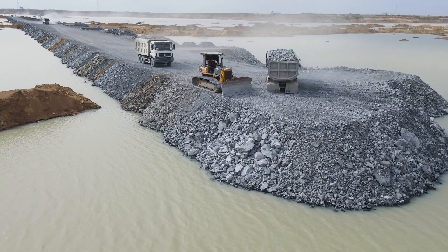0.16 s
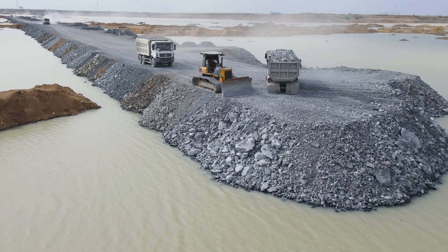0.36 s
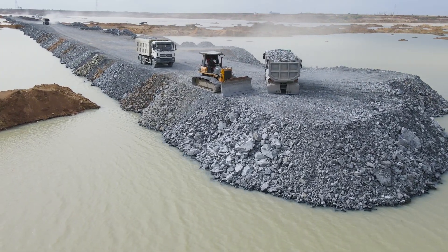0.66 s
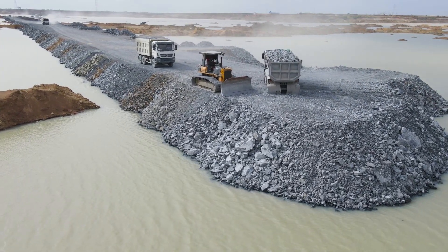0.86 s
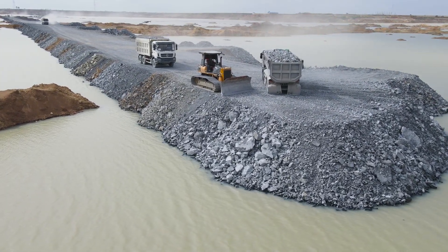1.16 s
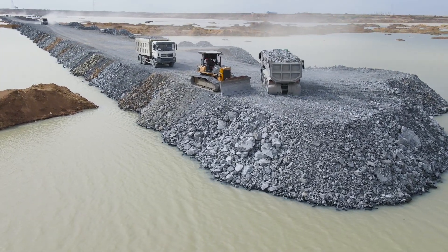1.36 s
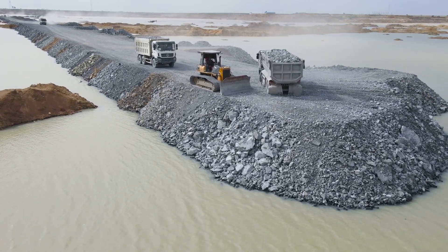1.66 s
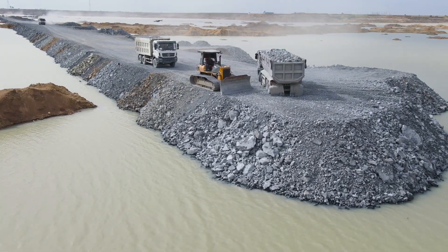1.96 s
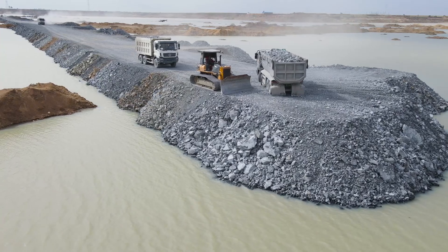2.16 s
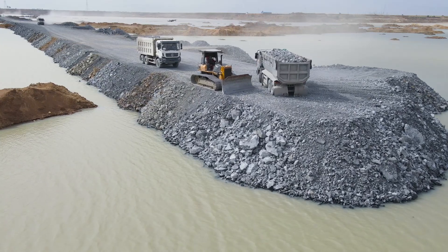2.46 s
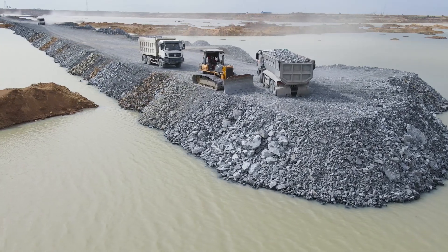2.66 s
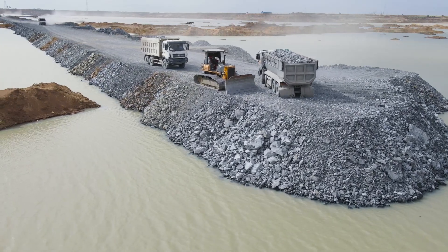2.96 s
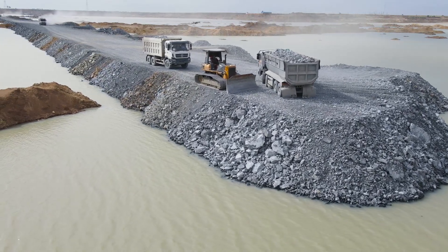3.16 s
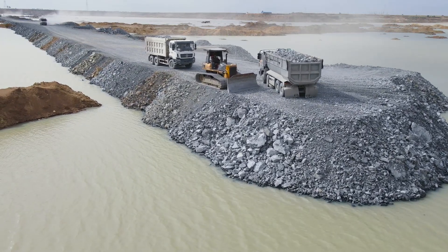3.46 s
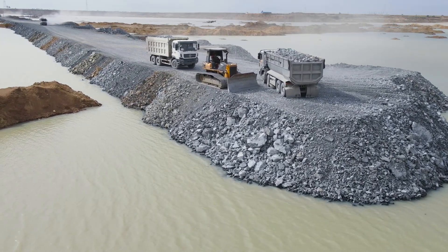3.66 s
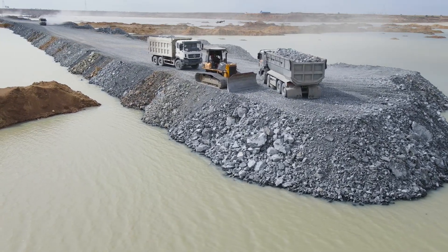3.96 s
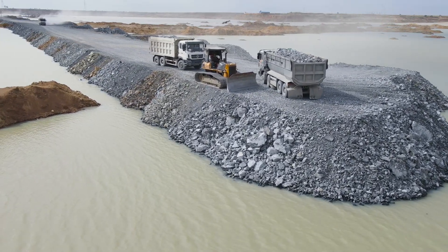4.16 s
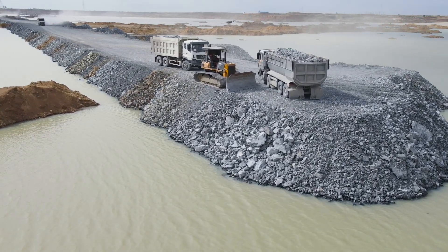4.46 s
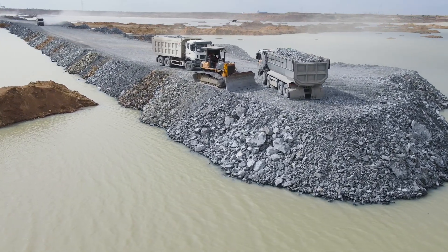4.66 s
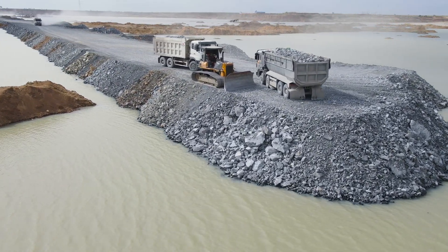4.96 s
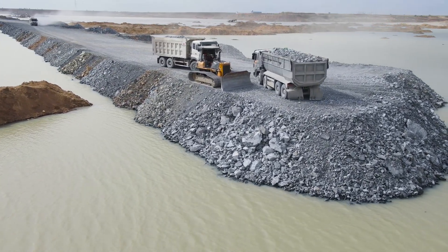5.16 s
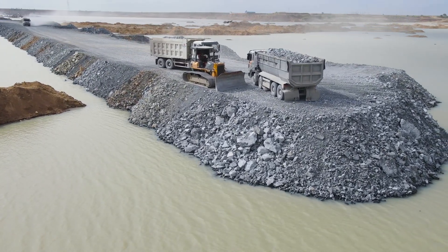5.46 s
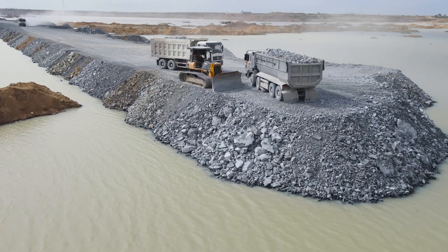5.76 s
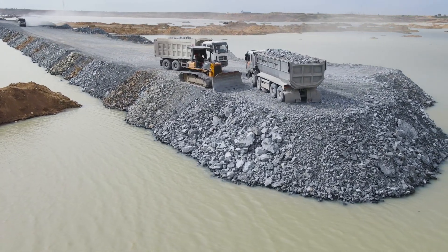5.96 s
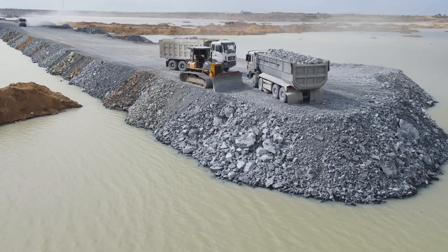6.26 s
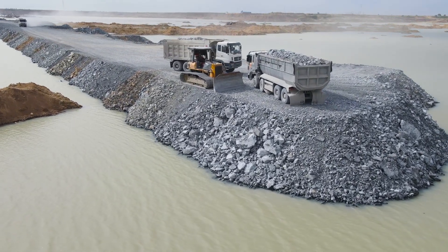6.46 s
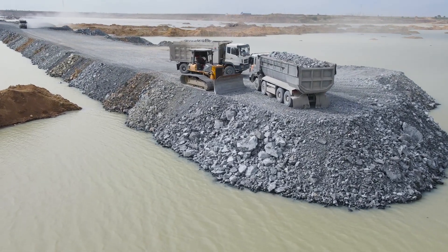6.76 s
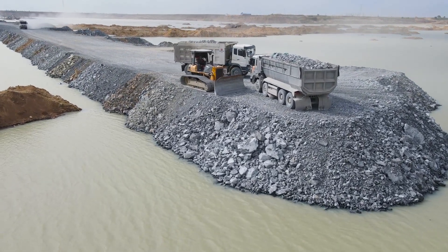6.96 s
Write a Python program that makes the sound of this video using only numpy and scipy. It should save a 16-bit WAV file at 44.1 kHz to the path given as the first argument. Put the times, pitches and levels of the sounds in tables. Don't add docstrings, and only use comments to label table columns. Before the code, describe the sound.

Heavy diesel earthmoving machines boom and roar on an open rock bank, growing louder, with knocks, crunching stones, thin turbo whistle and light wind buffeting.

```python
import sys
import numpy as np
from scipy import signal
from scipy.fft import rfft, irfft
from scipy.io import wavfile
from scipy.ndimage import uniform_filter1d, map_coordinates

SR = 44100
rng = np.random.default_rng(int(sys.argv[2]) if len(sys.argv) > 2 else 0)


def waveform_to_disk(signal):
    frames = np.transpose(np.atleast_2d(signal))
    scaled = np.clip(frames, -1, 1) * 32767
    samples = np.round(scaled).astype(np.int16)
    wavfile.write(sys.argv[1], SR, samples)


def gain_from_db(level_db):
    decades = np.asarray(level_db, float) / 20
    return 10 ** decades


N = 313551
TIME_S = np.arange(N) / SR
HZ = np.maximum(np.arange(N // 2 + 1) * SR / N, 1)
OPPOSITE = np.array([[1], [-1]])


def unit(x):
    return x / np.sqrt(np.mean(x ** 2))


def curves(table):
    s, *columns = np.transpose(table)
    return [np.interp(TIME_S, s, column) for column in columns]


def over_hz(table):
    hz, value = np.transpose(table)
    return np.interp(np.log(HZ), np.log(np.maximum(hz, 1)), value)


def swells(table):
    return sum(db * np.exp(-((TIME_S - s) / half) ** 2) for s, db, half in table)


def walk(rate_hz):
    hold = int(SR / rate_hz)
    steps = np.repeat(rng.standard_normal(N // hold + 1), hold)
    smooth = uniform_filter1d(uniform_filter1d(steps, hold), hold)
    return unit(smooth[:N])


def noise(colour, lo_hz, hi_hz):
    below = (colour[0][0] / HZ / 2) ** 8
    above = (HZ / colour[-1][0] / 2) ** 8
    gain = gain_from_db(over_hz(colour)) / (1 + below + above)
    inside = (HZ > lo_hz) & (HZ < hi_hz)
    gain = gain / np.sqrt(np.sum(gain[inside] ** 2) / len(HZ))
    return irfft(rfft(rng.standard_normal(N)) * gain, N)


# time_s, firing_rate_hz, boom_db
EXHAUST = [(0, 71.1, -23.5), (.34, 71.9, -21.5), (.57, 67.68, -17.5), (.72, 61.14, -12.5),
           (1.25, 61.85, -13), (1.46, 58.79, -12), (2.08, 58.55, -12), (2.24, 59.79, -13),
           (2.79, 59.33, -13.5), (3.44, 59.96, -16), (3.6, 60.15, -11), (4.45, 60.93, -13.5),
           (5.0, 65.18, -10.5), (5.43, 65.24, -9.5), (5.62, 68.2, -10), (6.36, 66.25, -11),
           (6.5, 64.1, -11), (7.11, 60.7, -9.5)]
# time_s, depth_db, half_length_s
DROPOUTS = [(.1, 14, 0.021), (.26, 1, .06), (.47, 2, .04), (.655, 8, 0.041), (1.08, 3, 0.051),
            (2.16, 5, 0.037), (2.32, 17, 0.02), (2.64, 3, 0.058), (2.89, 9.5, 0.076), (3.25, 4, .03),
            (3.76, 3, 0.073), (4.22, 1.5, 0.014), (4.43, 8.5, 0.015)]
# times_firing_rate, under_boom_db
OVERTONES = [(2 / 3, -37), (4 / 3, -31.5), (5 / 3, -28.5), (2, -18), (7 / 3, -32), (8 / 3, -31.5),
             (3, -23.5), (10 / 3, -24), (3.7, -36), (4, -28), (13 / 3, -27), (14 / 3, -22.5), (6.2, -37),
             (19 / 3, -27), (10, -33.5)]
# time_s, against_full_load_db
LOAD = [(0, -15.5), (.8, -11.5), (1.4, -10), (1.7, -8), (1.95, -13.5), (2.2, -10), (2.9, -8.5), (3.3, -6.5),
        (3.8, -8.5), (4.4, -7.5), (4.9, -2.5), (5.2, 1), (5.8, -0.5), (6.3, -1.5), (7.11, -1)]


def exhaust():
    hz, boom_db = curves(EXHAUST)
    boom_db = boom_db - swells(DROPOUTS)
    phase = 2 * np.pi * np.cumsum(hz * (1 + 0.0056 * walk(25))) / SR
    boom = gain_from_db(boom_db + 0.58 * walk(30)) * np.sin(phase)
    slow_db = uniform_filter1d(boom_db, SR // 3)
    skew_rad = np.interp(curves(LOAD)[0], [-8, -2], [0.5, 1.5])
    for k, db in OVERTONES:
        level = gain_from_db(slow_db + db + 2.25 * walk(9))
        boom = boom + level * np.sin(k * phase + skew_rad * (k - 1) + 0.43 * walk(5))
    return np.sqrt(2) * boom, phase


def layer_db(full_db, share, leaving_db):
    lift_s, fade_db_per_s = 0.78, 9
    effort_db, = curves(LOAD)
    near = gain_from_db(full_db + share * effort_db)
    leaving = gain_from_db(leaving_db - fade_db_per_s * np.maximum(TIME_S - lift_s, 0))
    return 10 * np.log10(near ** 2 + leaving ** 2)


# pitch_hz, level_db (per Hz)
THUD = [(25, -24), (45, -10.5), (90, 4), (150, -1), (230, -0.5), (300, -12.5)]
# time_s, level_db, half_length_s
BUMPS = [(.15, -7.5, 0.13), (.64, 4, 0.059), (1.0, 3, 0.024), (1.55, -6, 0.47), (2.15, 3.5, 0.35),
         (2.55, 4.5, 0.062), (3.07, -22, 0.21), (3.47, -10, 0.077), (3.66, -5.5, 0.026), (4.15, 5, 0.17),
         (4.8, 3.5, 0.11), (5.12, 1, 0.11), (5.3, -4.5, 0.083), (5.79, 1, 0.099), (6.7, -5, 0.21)]


def thud(phase):
    db = layer_db(-23, 0.66, -68) + swells(BUMPS) + 1.2 * walk(8)
    return (1 + 0.52 * np.cos(phase)) * gain_from_db(db) * noise(THUD, 139.0, 242)


# pitch_hz, level_db (per Hz)
RUMBLE = [(200, -48), (270, -0.5), (420, 2.5), (520, -4), (700, -17), (1000, -25)]


def rumble():
    return gain_from_db(layer_db(-25.5, 0.36, -25.5) - 0.26) * noise(RUMBLE, 290, 660)


# pitch_hz, level_db (per Hz)
ROAR = [(300, -35), (650, 3), (900, 0), (1300, -2.5), (1700, -8), (2200, -7), (2900, -6.5), (3300, -9.5),
        (3800, -13), (4800, -10.5), (6000, -35.5)]


def roar(phase):
    db = layer_db(-24.5, 0.94, -42) + 1.04 * walk(10)
    return gain_from_db(db) * (1 + 0.07 * np.cos(phase)) * noise(ROAR, 908, 2630)


# pitch_hz, level_db (per Hz)
HISS = [(3500, -4), (5200, 7), (6000, 5.5), (7500, 4.5), (9000, 2), (10000, 7), (11000, 2.5), (11600, -5.5),
        (12100, -47)]


def hiss():
    return gain_from_db(layer_db(-41, 0.75, -53.5) + 1.13 * walk(15)) * noise(HISS, 5380, 7560)


def machines(phase):
    return thud(phase) + rumble() + roar(phase) + hiss()


# time_s, whistle_hz, level_db
TURBO = [(0, 10140, -49), (.7, 10000, -54), (1.4, 9840, -44), (1.55, 9540, -41), (1.9, 8580, -63),
         (2.2, 7900, -58), (2.55, 7370, -50), (2.9, 6680, -74), (3.3, 6350, -62), (5.2, 6880, -73),
         (5.48, 7200, -53), (5.7, 7720, -43), (5.85, 7970, -53), (6.05, 7960, -54), (6.25, 7870, -46),
         (6.8, 7450, -44.5), (6.9, 7540, -65), (7.11, 7350, -42)]


def turbo():
    hz, db = curves(TURBO)
    waver_db = 2 * walk(22)
    phase = 2 * np.pi * np.cumsum(hz * (1 + 0.003 * walk(110))) / SR
    port_lead_rad = np.array([[1.9], [0]])
    return np.sqrt(2) * gain_from_db(db + waver_db) * np.sin(phase + port_lead_rad)


# time_s, above_calm_db, half_length_s
WIND = [(.1, 16, 0.46), (.72, 24, 0.41), (1.25, 9, 0.18), (1.6, 20, 0.57), (2.0, 13.5, 0.22),
        (2.42, 18, 0.15), (3.3, 27.5, 0.51), (3.8, 9.5, 0.24), (4.6, 3, .25), (5.0, -4, 0.25),
        (5.3, 22, 0.19), (5.62, -1, .17), (6.1, 15, 0.08), (7.11, 30, 0.094)]
# pitch_hz, level_db (per Hz)
BUFFET = [(20, -13), (60, 3), (120, -1.5), (250, -12.5), (450, -13.5), (800, -24), (1200, -34)]


def wind():
    calm_db = -50.5
    db = calm_db + swells(WIND) + 3 * walk(14)
    across = gain_from_db(db + walk(17)) * noise(BUFFET, 83, 210)
    along = gain_from_db(db + walk(17)) * noise(BUFFET, 83, 210)
    return across * OPPOSITE + gain_from_db(-6.5) * along


# time_s, peak_db, centre_hz, length_s
KNOCK = [
    (0.572, -18, 230, 0.0026),
    (0.589, -5, 295, 0.0021),
    (0.619, -6.5, 263, 0.0028),
    (.632, -2, 187, 0.0019),
]


def knocks():
    out = 0
    for s, db, hz, length in KNOCK:
        swing = np.cos(2 * np.pi * hz * (TIME_S - s))
        out = out + gain_from_db(db) * swing * np.exp(-((TIME_S - s) / length) ** 2)
    return out


def grind(table):
    grit = rfft(rng.standard_normal(N) * gain_from_db(2.1 * rng.exponential(size=N)))
    out = 0
    for s, db, hz, width, length in table:
        resonance = 1 / (1 + 1j * (HZ ** 2 - hz ** 2) / (HZ * width)) ** 2
        ring = unit(irfft(grit * resonance, N))
        out = out + gain_from_db(db) * ring * np.exp(-np.abs((TIME_S - s) / length) ** 2.8)
    return out


# time_s, level_db, centre_hz, width_hz, length_s
CRUNCH = [(0.612, -25, 210, 290, 0.034), (0.794, -37.5, 5030, 5800, 0.012),
          (1.383, -31.5, 2200, 3450, 0.045), (1.568, -43, 1800, 3020, 0.029),
          (1.644, -30.5, 2540, 4000, .012), (1.902, -40, 2000, 3500, 0.017),
          (2.392, -35, 1507, 2497, 0.0091), (3.097, -28.5, 2200, 3350, 0.027),
          (5.692, -32.5, 4100, 4900, 0.019), (5.693, -27, 3730, 91, 0.022), (5.69, -25.5, 1800, 3000, .03),
          (5.785, -33.5, 5000, 6000, 0.016), (5.704, -19, 663, 153, 0.028), (5.825, -21.5, 700, 160, 0.045),
          (5.795, -24, 640, 150, .012), (5.97, -22.5, 500, 150, 0.016), (6.14, -31, 5500, 5100, 0.0096)]


def crunches():
    return grind(CRUNCH)


# time_s, level_db, centre_hz, width_hz, length_s
SCRAPE = [
    (1.375, -29, 1500, 1900, .012),
    (1.395, -32, 2000, 1900, .02),
    (1.56, -28, 1300, 1800, .035),
    (1.595, -34.5, 1500, 1700, .015),
    (1.65, -36, 1500, 1900, .01),
    (1.89, -33.5, 1300, 1900, .025),
    (3.1, -36, 2000, 2597, .02),
    (3.27, -25, 350, 497, .1),
    (3.44, -24, 300.1, 500, 0.054),
]


def scrapes():
    return grind(SCRAPE) * OPPOSITE


# pitch_hz, share (0-1)
PORT_LIKENESS = [(60, .998), (130, .88), (300, .9), (600, .85), (780, .82), (920, .96), (1050, .8),
                 (1200, .78), (1700, .95), (2000, .9), (2600, .55), (3150, .96), (3500, .88), (4050, .65),
                 (4500, .93), (5000, .9), (5250, .7), (5600, .995), (7100, .96), (8100, .6), (9300, .62),
                 (10000, .78), (10600, .99)]
# pitch_hz, left_lead_radians
DUCT = [(5020, 0), (5330, 3.1), (7410, 3.3), (8100, 4.6), (9200, 5.7), (10000, 6.1), (10500, 6.25)]
# pitch_hz, left_lead_radians
FACING = [(0, 0), (690, .5), (1300, -1.1), (1750, 0), (2580, 0), (3270, 1.9), (3880, .9), (4900, 3.2)]
OBLIQUE = [(0, 0), (690, .6), (1250, -1), (1600, 0), (2400, .1), (3050, 2.6), (3600, 2.6), (4100, 1),
           (4900, 3.2)]
ASKEW = [(0, 0), (2400, .2), (3000, 3.6), (3500, 2.6), (4000, 2.2), (4500, 3), (4900, 3.2)]
SLANT = [(0, 0), (430, -.5), (800, -2.8), (1020, -1.6), (1300, -3.6), (1700, -5.4), (2400, -5.1),
         (3100, -3.3), (4000, -4.2), (4900, -3.1)]
TURNED = [(0, 0), (300, -.4), (430, -1), (650, -2.8), (1050, -3.3), (1620, -4.9), (2500, -4.2),
          (3150, -3.6), (3500, -4.2), (4050, -4.4), (4900, -3.1)]
TURNING = [(0, 0), (430, -.7), (600, -2.2), (800, -4.2), (1020, -6.2), (1300, -5), (1750, -5.6),
           (2300, -4.5), (3100, -3.2), (4000, -3.9), (4900, -3.1)]
HALF = [(0, 0), (430, -.4), (600, -1.4), (850, -6), (1050, -5.9), (1300, -6.9), (1600, -6.3), (2000, -6.3),
        (3200, -9.4), (3880, -10.5), (4900, -9.4)]
AWAY = [(0, 0), (300, -.6), (520, -2.1), (920, -3.14), (1290, -3.9), (1640, -5.3), (2070, -5.2),
        (2580, -3.1), (3790, -4.6), (4900, -3.1)]
BEHIND = [(0, 0), (300, -.5), (480, -2), (900, -3.14), (1050, -3.4), (1640, -5.2), (2070, -5.1),
          (2500, -3.4), (3750, -4.4), (4450, -3.2), (4900, -3.1)]
# pitch_hz, left_minus_right_db
SHADE_FACING = [(340, 0), (800, 3), (1300, 2), (2200, 0), (3000, -1), (3900, -2), (4800, 0), (10800, 0)]
SHADE_SLANT = [(340, 0), (600, -1), (800, -6), (1050, -4), (1300, -6), (1600, -1), (2300, -1), (3000, -5),
               (4500, -1), (10800, 0)]
SHADE_TURNED = [(340, 0), (600, -1), (800, -5), (1300, -5), (2200, -2), (2800, -5), (3150, -3),
                (4100, -1.5), (10800, 0)]
SHADE_TURNING = [(340, 0), (600, -1.5), (800, -7), (1100, -2), (1400, -4), (2500, -9), (3200, -2),
                 (4600, -2), (10800, 0)]
SHADE_HALF = [(340, 0), (600, 0), (800, -5), (1100, 0), (1600, -1), (2500, -9), (3200, -3), (4600, -2),
              (10800, 0)]
SHADE_AWAY = [(340, 0), (600, -6), (780, -4.5), (920, -1), (1080, -6), (1300, -6), (2400, -3), (3100, -6),
              (3800, -5), (4800, -1), (10800, 0)]
SHADE_BEHIND = [(340, 0), (600, -6), (780, -4.5), (900, -1.5), (1080, -6), (1400, -7), (2400, -2),
                (3100, -3.5), (3800, -4), (4400, 0), (10800, 0)]
# start_s, lead table, shade table
HEADINGS = [
    (0, FACING, SHADE_FACING),
    (.55, OBLIQUE, SHADE_FACING),
    (1.3, ASKEW, SHADE_FACING),
    (2.2, SLANT, SHADE_SLANT),
    (2.78, TURNED, SHADE_TURNED),
    (3.5, TURNING, SHADE_TURNING),
    (4.1, HALF, SHADE_HALF),
    (4.7, AWAY, SHADE_TURNED),
    (5.2, AWAY, SHADE_AWAY),
    (6.15, BEHIND, SHADE_BEHIND),
]


def ports(shared, scattered):
    like = np.clip(over_hz(PORT_LIKENESS), 0, 1)
    duct_rad = np.interp(HZ, *np.transpose(DUCT))
    right = 0
    ends_s = [s for s, _, _ in HEADINGS[1:]] + [np.inf]
    for (start_s, phase, shade), end_s in zip(HEADINGS, ends_s):
        lead = np.exp(1j * (np.interp(HZ, *np.transpose(phase)) + duct_rad))
        mixed = like * shared / lead + np.sqrt(1 - like ** 2) * scattered
        heard = irfft(mixed * gain_from_db(-over_hz(shade)), N)
        held = (TIME_S >= start_s) & (TIME_S < end_s)
        right = right + uniform_filter1d(1.0 * held, size=SR // 5) * heard
    right = map_coordinates(right, [np.arange(N) + 0.28 * walk(12)], mode="mirror")
    return np.array([irfft(shared, N), right])


def scene():
    boom, phase = exhaust()
    shared = rfft(boom + machines(phase) + knocks() + crunches())
    scattered = rfft(machines(phase) + crunches())
    return ports(shared, scattered) + turbo() + wind() + scrapes()


def top_cut(x):
    return signal.sosfilt(signal.butter(12, 11750, fs=SR, output="sos"), x)


def record(dry):
    soft = np.tanh(0.72 * dry) / 0.79
    held = soft / (1 + (soft / 0.99) ** 10) ** (1 / 10)
    return top_cut(held)


dry = scene()
out = record(dry)
waveform_to_disk(out)
```